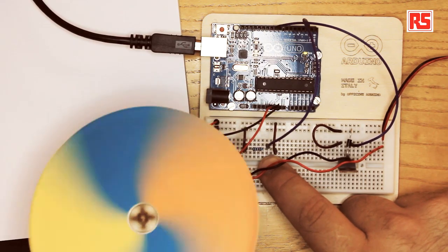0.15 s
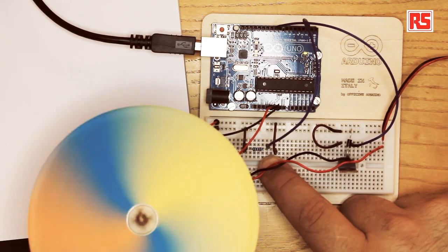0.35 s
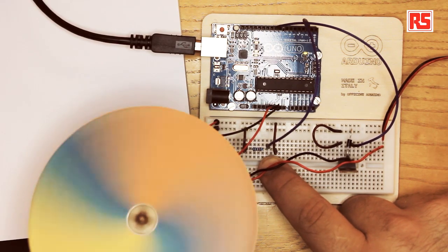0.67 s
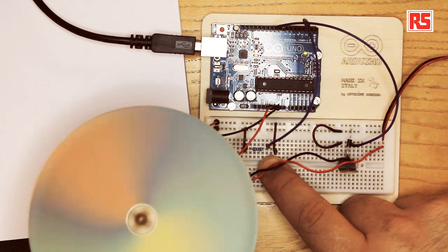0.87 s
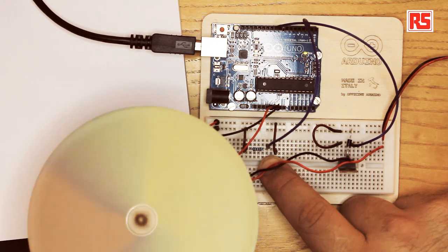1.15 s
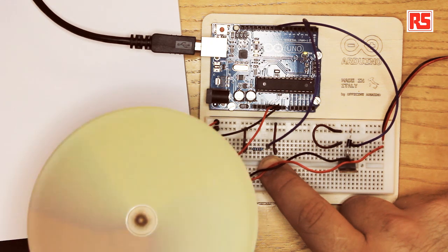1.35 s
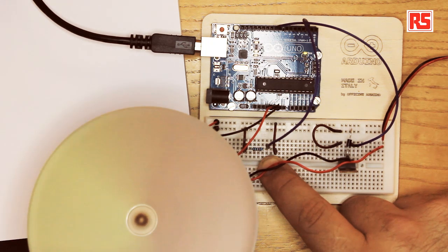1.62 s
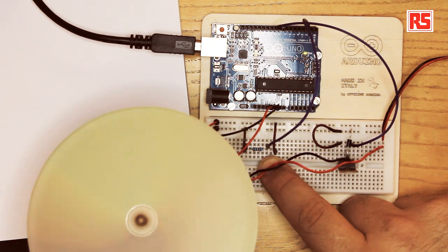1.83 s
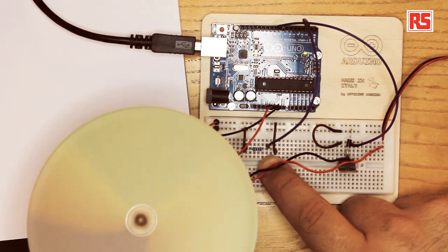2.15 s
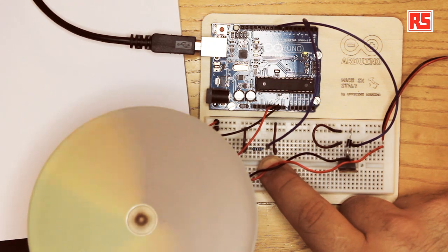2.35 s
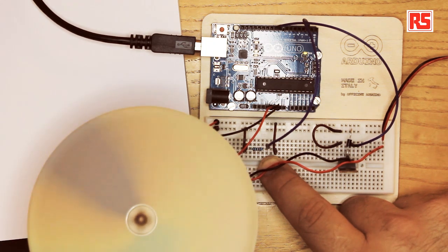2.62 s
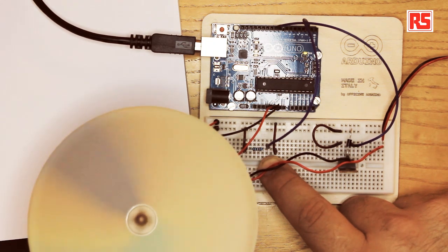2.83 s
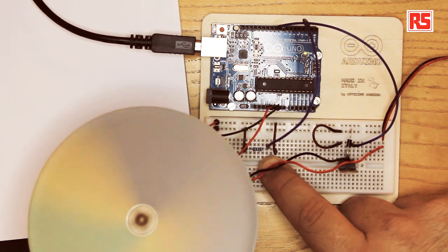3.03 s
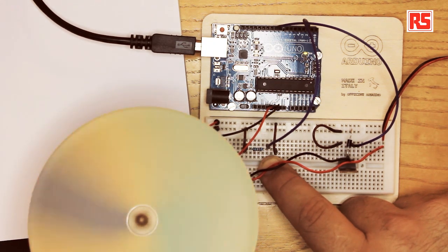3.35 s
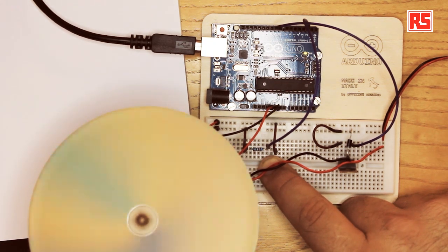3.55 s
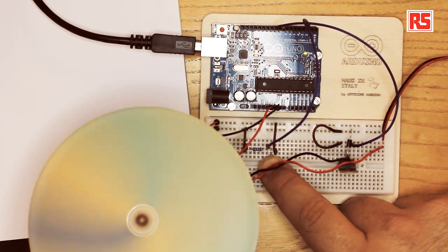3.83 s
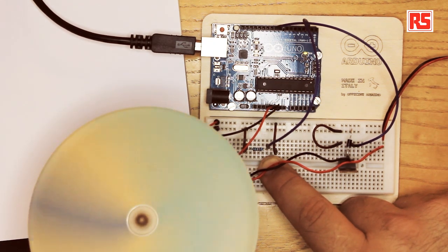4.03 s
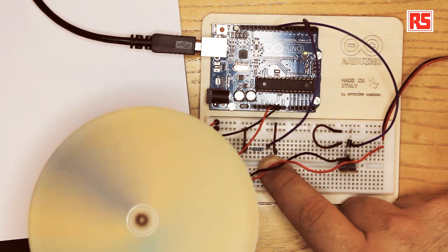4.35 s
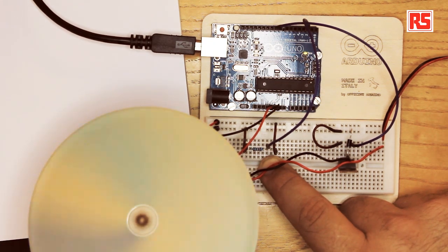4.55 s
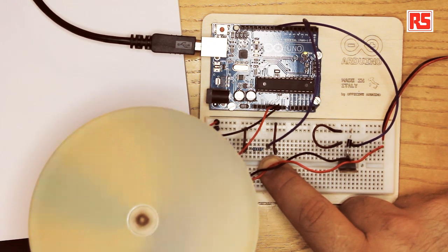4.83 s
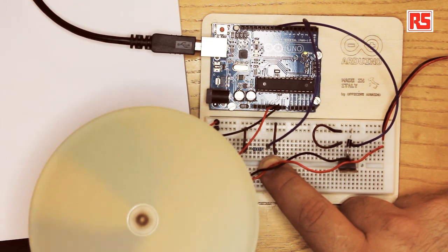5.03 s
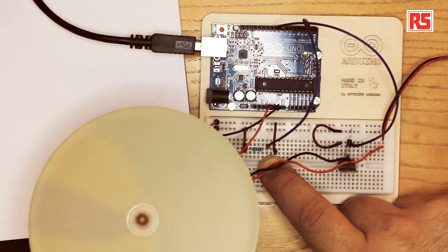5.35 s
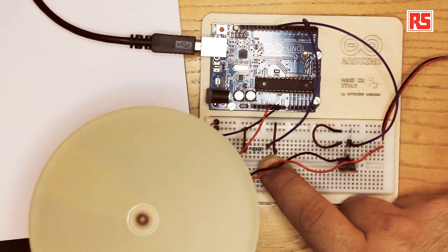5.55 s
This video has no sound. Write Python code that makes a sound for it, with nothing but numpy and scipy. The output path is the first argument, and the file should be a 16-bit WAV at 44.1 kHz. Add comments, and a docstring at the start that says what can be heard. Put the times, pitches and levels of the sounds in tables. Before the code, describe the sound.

A small hobby motor spins up a light disc on a table. For about 1.2 seconds its loose shaft squeals loudly around 700 Hz, throbbing faster and faster. A quick downward slip cuts it; after a brief near-gap a far quieter whirl catches, a dense knocking buzz near 250 Hz with thin metallic treble and brushing hiss, sinking slightly to the end. Close microphone, dry quiet room, faint hum.

```python
"""Motor-driven card disc with a rattling shaft

A small motor spins up a light card disc on a table; its shaft rattles in the loose bearing. First a loud squeal
throbs with each turn: harmonics split into lines one turn apart. After a sudden slip, a gliding note, comes a
slower whirl of light knocks: low lines mixed with the shaft speed and a comb coloured by the casing resonances.
Filtered noise gives brush hiss, a scrape once a turn and a low room rumble; a wavering sine gives mains hum."""
import sys
import numpy as np
from scipy import signal
from scipy.fft import rfft, irfft
from scipy.io import wavfile

SR = 44100
rng = np.random.default_rng(int(sys.argv[2]) if len(sys.argv) > 2 else 0)


def wav_out(sig):
    """Save sig, one row per channel (or a flat mono array), as 16-bit PCM at SR to the path in sys.argv[1]."""
    wavfile.write(sys.argv[1], SR, np.round(np.clip(np.atleast_2d(sig).T, -1, 1) * 32767).astype(np.int16))


def attenuation_scalar(level_db):
    """Turn a level in dB into a linear amplitude multiplier (20 dB per decade)."""
    decades = np.asarray(level_db, float) / 20
    return 10 ** decades


N = 250488
TIME = np.arange(N) / SR

# brush and bearing hiss in the table top: f/Hz, relative density/dB
TABLE_SPECTRUM = [(280, -15), (480, -6), (718, -7), (815, -12.5), (954, -5.5), (1120, -15.5), (1440, -2),
                  (1880, -12), (2420, -13.5), (2920, -6.5), (3380, -19.5), (4530, -13.5), (5000, -23.5),
                  (6500, -7), (11000, -120)]
# falling note as the shaft slips out of the squeal: start/s, peak/dB, from/Hz, to/Hz, length/s
SLIP_NOTE = (1.23, -41, 640, 430, .022)
CUT_S = SLIP_NOTE[0] + SLIP_NOTE[4] / 2   # mid-slip: the squeal is cut
CATCH_S, COMB_ATTACK_S = 1.36, .12   # the whirl sets in; attack of its comb and scrape


def in_time(rows):
    """Columns of a table against t/s, read at every sample."""
    s, *columns = np.transpose(rows)
    return [np.interp(TIME, s, c) for c in columns]


def angle(hz):
    """Running phase of a rate curve, rad."""
    return 2 * np.pi * np.cumsum(hz) / SR


def rise(start_s, attack_s):
    """0 until the start, then exponentially towards 1."""
    return 1 - np.exp(-np.maximum(TIME - start_s, 0) / attack_s)


def drift(rate_hz, size=N):
    """Slow random curve of spread 1: two-pole low-passed noise, made at SR / 8."""
    r = np.exp(-16 * np.pi * rate_hz / SR)
    noise = rng.standard_normal(size // 8 + 3002)
    slow = signal.lfilter([1], [1, -2 * r, r * r], noise)[3000:]   # settled part
    return np.interp(np.arange(size) / 8, np.arange(len(slow)), slow / slow.std())


def spectrum_db(spectrum, hz):
    """A spectrum table read on a log frequency axis, -90 dB outside it."""
    points = np.array(spectrum)
    return np.interp(np.log(hz), np.log(points[:, 0]), points[:, 1], -90, -90)


def coloured(spectrum):
    """Noise of rms 1 with the given spectrum."""
    hz = np.fft.rfftfreq(N, 1 / SR) + 1
    x = irfft(rfft(rng.standard_normal(N)) * attenuation_scalar(spectrum_db(spectrum, hz)), N)
    return x / x.std()


def room():
    """Wavering mains hum, deep noise and passing low rumbles."""
    # passing rumbles: t/s, peak level/dB, 1/e half length/s
    passing = [(0.673, -71, 0.049), (2.027, -66, 0.083), (2.257, -60, 0.13), (2.48, -66, 0.095),
               (4.84, -62.5, 0.12), (5.35, -70, 0.17)]
    # deep noise: f/Hz, relative density/dB
    deep_spectrum = [(12, -60), (20, -31), (65, -11.5), (92, -2), (113, -17), (124, -22), (140, -19),
                     (180, -29), (310, -120)]
    hum_hz, hum_db, deep_db, rumble_floor_db = 100.8, -69.5, -70.5, -71.5
    hum_phase = 2 * np.pi * hum_hz * TIME + .5 * drift(12.0)
    hum = np.sqrt(2) * attenuation_scalar(hum_db + 2.0 * drift(5.1)) * np.sin(hum_phase)
    swells = sum(attenuation_scalar(db) * np.exp(-((TIME - s) / half_s) ** 2) for s, db, half_s in passing)
    floor = attenuation_scalar(rumble_floor_db + 2.0 * drift(1.8))
    rumble = (floor + swells) * coloured([(120, -4), (160, 2), (300, 4.0), (400, 1.0)])
    return hum + rumble + attenuation_scalar(deep_db) * coloured(deep_spectrum)


def surge_db():
    """A brief level bump as the whirl catches."""
    peak_db, peak_after_s = 2, 0.065
    part = np.maximum(TIME - CATCH_S, 0) / peak_after_s
    return peak_db * part * np.exp(1 - part)


def hiss_db(start_db, squeal_db_per_s, slipped_db, whirl_db, whirl_db_per_s):
    """A ramp during the squeal; a drop at the slip, a return, a surge and a slow trend."""
    return_s = 0.056
    later = slipped_db + (whirl_db - slipped_db) * rise(CUT_S, return_s)
    later = later + surge_db() + whirl_db_per_s * (TIME - CUT_S)
    return np.where(TIME < CUT_S, start_db + squeal_db_per_s * TIME, later)


def hiss(turn, knock):
    """Brush and bearing rubbing noise: pulses with each turn in the table top, also with each knock in the casing."""
    # both levels: start/dB, squeal slope/(dB/s), just after the slip/dB, whirl/dB, whirl slope/(dB/s)
    table_level = (-61.5, 0, -63, -54, -0.66)
    casing_level = (-52.5, 2, -62, -48.5, -1.27)
    # hiss in the casing: f/Hz, relative density/dB
    casing_spectrum = [(4000, -44), (5000, -26), (5900, -18), (6500, -11), (7000, -19), (7400, -14),
                       (8200, -20), (9700, -14), (10500, -4), (11900, -5), (12500, -13), (13200, -10),
                       (14200, -18), (15000, -14), (16000, -15)]
    table_pulse = 1 + 0.18 * np.cos(turn - 1.3) + 0.074 * np.cos(2 * turn)
    table = attenuation_scalar(hiss_db(*table_level)) * table_pulse * coloured(TABLE_SPECTRUM)
    casing_pulse = (1 + 0.38 * np.cos(knock)) * (1 + 0.12 * np.cos(2 * turn - .4))
    casing = attenuation_scalar(hiss_db(*casing_level)) * casing_pulse * coloured(casing_spectrum)
    return attenuation_scalar(2.1 * drift(61.0)) * (table + casing)


def side_tone():
    """A faint rising sine beside the squeal, wavering in level."""
    # t/s, f/Hz, mean level/dB
    pitch_and_level = [(0, 900, -66), (.25, 958, -69), (.73, 1027, -73), (1.0, 1050, -90)]
    hz, db = in_time(pitch_and_level)
    return np.sqrt(2) * attenuation_scalar(db + 3.0 * drift(7.9)) * np.sin(angle(hz))


def scrape(turn):
    """One noise burst a turn in the whirl, coloured by the table top and wavering in level."""
    # f/Hz, relative density/dB
    scrape_spectrum = [(1100, -23), (1350, -2), (1460, -4.5), (1650, -7), (2400, -30), (2750, -5),
                       (2950, 0), (3300, -42)]
    catch_db, db_per_s, sharpness, burst_rad = -58, 1, 6.2, 0.92
    burst = np.exp(sharpness * (np.cos(turn - burst_rad) - 1))
    level = attenuation_scalar(catch_db + db_per_s * (TIME - CATCH_S) + 2.5 * drift(5.0))
    return level * rise(CATCH_S, COMB_ATTACK_S) * burst * coloured(scrape_spectrum)


def slip():
    """The shaft slips out of the squeal: a brief sine gliding down under a sin^2 envelope."""
    start_s, peak_db, from_hz, to_hz, length_s = SLIP_NOTE
    part = np.clip((TIME - start_s) / length_s, 0, 1)
    glide = np.sin(angle(from_hz + (to_hz - from_hz) * part))
    return attenuation_scalar(peak_db) * np.sin(np.pi * part) ** 2 * glide


def casing_db(hz):
    """Gain of the casing: its resonances over a weak plateau in the treble."""
    # f/Hz, width/Hz, peak gain over the plateau's power/dB
    resonances = [(7330, 90, -6), (7750, 400, -13), (9000, 900, -14), (10550, 260, 2), (11250, 260, -4),
                  (12050, 330, -6), (13200, 600, -11), (15000, 700, -15)]
    plateau_db = -24
    power = attenuation_scalar(2 * plateau_db) / (1 + (6500 / hz) ** 6)
    for centre_hz, width_hz, db in resonances:
        power = power + attenuation_scalar(2 * db) / (1 + (2 * (hz - centre_hz) / width_hz) ** 2)
    return 10 * np.log10(power)


def low_family(turn, knock):
    """A low tone and its partners, evenly spaced around two whirl lines."""
    # low tone: t/s, f/Hz, level/dB
    low_tone = [(1.36, 326, -100), (1.45, 338, -70), (1.6, 353.4, -58), (1.9, 353.5, -58), (2.8, 342, -59),
                (3.6, 330, -64), (4.6, 315, -88)]
    hz, db = in_time(low_tone)
    main = 2 * knock - 2 * turn
    step = main - angle(hz)
    # multiple of main, steps, relative level/dB; the first is the low tone itself
    partners = [(1, -1, 0.0), (1, 1, -6.0), (1, 2, -8.0), (2, 1, -8.0), (2, -1, -9.0), (2, -2, -7.0)]
    lines = sum(attenuation_scalar(d + 0.5 * drift(11.0)) * np.sin(k * main + m * step) for k, m, d in partners)
    return np.sqrt(2) * attenuation_scalar(db) * lines


def fine_lines(turn, knock_hz, knock):
    """No two knocks of a turn are alike, so faint lines one turn apart surround each low overtone."""
    base_db = -69   # before the table-top spectrum
    out, facing = np.zeros(N), np.exp(1j * turn)
    for k in range(2, 14):
        spread_db, start_rad = rng.normal(0, 4, 9), rng.uniform(0, 2 * np.pi, 9)
        pattern = np.polyval(attenuation_scalar(spread_db) * np.exp(1j * start_rad), facing) / facing ** 4   # -4 to +4 turns
        level = attenuation_scalar(base_db + spectrum_db(TABLE_SPECTRUM, k * knock_hz) + 1.9 * drift(1.9))
        out += level * np.real(pattern * np.exp(1j * k * knock))
    return out


def low_lines(turn, knock, settled):
    """Clean low lines of the whirl, at knock rate multiples mixed with shaft speed multiples."""
    # multiple of knock rate, multiple of shaft speed, level at 1.7 s before trim and swell/dB, slope/(dB/s)
    mixed_lines = [(2, -2, -55, .1), (2, -1, -72, 0), (2, 0, -72, 0), (2, 1, -70, 0), (3, 0, -65, -.3),
                   (4, -4, -64, 0), (6, -1, -68, 0), (6, 0, -59, -1.4), (6, 1, -64, -1), (9, 0, -65, .3),
                   (9, -1, -73, 0), (12, 0, -70, .4)]
    # multiples 4 and 9 swell for a while: t/s, gain/dB, 1/e half length/s
    line_swell = (4.2, 4, .7)
    trim_db, delay_s, attack_s = -0.5, .018, .025
    swell_s, swell_peak_db, half_s = line_swell
    swell_db = swell_peak_db * np.exp(-((TIME - swell_s) / half_s) ** 2)
    out = np.zeros(N)
    for k, m, db, db_per_s in mixed_lines:
        level_db = db + db_per_s * (TIME - 1.7) + 1.0 * drift(3.0)
        if k in (4, 9):
            level_db = level_db + swell_db
        if k == 6:
            level_db = level_db + 1.5 * drift(15.0)
        line = attenuation_scalar(level_db) * np.sin(k * knock + m * turn + k * m)
        out += line * settled if k >= 6 else line
    return attenuation_scalar(trim_db + surge_db()) * rise(CATCH_S + delay_s, attack_s) * out


def whirl(turn, knock_hz, knock):
    """Steady knocks: low lines mixed with the shaft speed, and a comb of high overtones coloured by the casing."""
    # gain of the comb: t/s, gain/dB
    comb_gain = [(2.3, 0), (3.7, -1.5), (4.8, -1), (5.68, -1.5)]
    # overtones that stand out or fall back: multiple of knock rate, gain/dB
    odd_overtones = {43: 2, 45: 1.5, 47: 4, 48: -7, 51: 5}
    knock_db, every_third_db = -54.5, 4   # before the casing gain
    settled = attenuation_scalar(in_time(comb_gain)[0]) * rise(CATCH_S, COMB_ATTACK_S)
    out = low_lines(turn, knock, settled) + settled * fine_lines(turn, knock_hz, knock)
    coarse_hz, coarse_index = knock_hz[::256], np.arange(0, N, 256)   # levels vary slowly
    facing = np.exp(1j * turn)
    for k in range(14, 68):
        db = knock_db + casing_db(k * coarse_hz) + every_third_db * (k % 3 == 0)
        db = db + odd_overtones.get(k, 0) + 2.0 * drift(1.0)[::256]
        level = np.interp(np.arange(N), coarse_index, attenuation_scalar(db))
        # each overtone peaks at its own angle of the turn
        throb = 1 + .3 * facing * np.exp(.4j * k) + .2 / facing ** 2 * np.exp(.9j * k)
        out += settled * level * np.real(throb * np.exp(1j * (k * knock + rng.uniform(0, 7.5))))
    return np.sqrt(2) * out


def squeal(turn):
    """The rattle radiates in a pattern that turns with the disc, so each harmonic splits into lines one turn apart."""
    # t/s, rattle rate before the sag/Hz
    rattle_rate = [(0, 700.7), (.35, 711.7), (.75, 725), (1.2, 733.5)]
    # harmonics 1, 2, ..: side lines before the swell/dB, centre over side lines at 0 s/dB,
    # upper over lower side line/dB, pattern angle/turns
    harmonics = [(-40, 5.5, -8, .68), (-43.5, -15, -6, 0.56), (-56.5, -15, -10.5, 0.83),
                 (-51, -19, 6, 0.14), (-58, -35, -1.5, 0.56), (-61, -35, 0.5, 0.628), (-69, -24, -4, 0.635),
                 (-62.5, -26, 0, 0.13), (-59.5, -1.5, -1, 0.664)]
    # rasp between the harmonics: f/Hz, relative density/dB
    rasp_spectrum = [(1200, -2), (1900, -5.5), (2500, -1), (3200, -3), (4000, -8.5), (5500, -5),
                     (6500, 1.5), (7500, -29)]
    # the table top radiates poorly here: f/Hz, width/Hz
    table_dips = [(1090, 546), (2480, 410)]
    low_cut_hz = 712   # the squeal is cut away below here
    sag_hz, sag_s = 24.93, 0.01425   # the rate sags just before the cut
    cut_db, cut_length_s, tail_db_per_s = -16, 0.002, -160   # the slip leaves a faint tail that dies away
    high_db = -64.5   # harmonics 10 to 18, before the casing gain
    centre_fade_db_per_s, outer_db = -15, -7   # the throb turns from once to twice a turn
    swell_db_per_s, brighten_db_per_s_octave = -1, 3.5
    rasp_db, rasp_db_per_s = -49, 0.5

    size = round(1.5 * SR)
    t, turn = TIME[:size], turn[:size]
    after_s = t - CUT_S
    sag = sag_hz * np.exp(np.minimum(after_s, 0) / sag_s) * (after_s < 0)
    hz = in_time(rattle_rate)[0][:size] - sag
    db = cut_db * np.clip(after_s / cut_length_s, 0, 1) + tail_db_per_s * np.maximum(after_s, 0)
    # uneven timing blurs the high harmonics
    rattle = angle(hz) + .15 * drift(12.0, size) + .11 * drift(120.0, size)
    # the rate wobbles within each turn
    rattle = rattle + 0.37 * np.sin(2 * turn + .5) + 0.15 * np.sin(turn + 1.7)

    high = [(high_db + casing_db(k * hz.mean()), 0, 0, rng.random()) for k in range(10, 19)]
    out = np.zeros(N)
    for k, (side_db, centre_db, lean_db, pattern_turns) in enumerate(harmonics + high, 1):
        facing = np.exp(1j * (turn - 2 * np.pi * pattern_turns))
        centre = attenuation_scalar(centre_db + centre_fade_db_per_s * t)
        pattern = attenuation_scalar(-lean_db / 2) / facing + centre + attenuation_scalar(lean_db / 2) * facing
        pattern = pattern + attenuation_scalar(outer_db) * np.log2(k) * (facing ** 2 - .6j / facing ** 2)
        swell = swell_db_per_s + brighten_db_per_s_octave * np.log2(k)
        level = attenuation_scalar(db + side_db + swell * np.minimum(t, 1.1) + 2.0 * drift(80.0, size))
        # harmonics roughly in step: one-sided pulses
        carrier = np.exp(1j * (k * rattle + rng.uniform(-1.1, 0.39)))
        out[:size] -= np.sqrt(2) * level * np.real(pattern * carrier)

    rasp_level = attenuation_scalar(db + rasp_db + rasp_db_per_s * t) * (1 + .5 * np.cos(rattle))
    out[:size] += rasp_level * coloured(rasp_spectrum)[:size]
    for dip_hz, width_hz in table_dips:
        out[:size] = signal.lfilter(*signal.iirnotch(dip_hz, dip_hz / width_hz, SR), out[:size])
    low_cut = signal.butter(4, low_cut_hz, "high", fs=SR, output="sos")
    out[:size] = signal.sosfilt(low_cut, out[:size])
    return out


def scene():
    """Sums room and motor; the motor parts other than the side tone and the slip note share the same shaft and
    knock phases."""
    # t/s, shaft speed/(turns/s)
    shaft_speed = [(0, 3.0), (.6, 10.71), (1.24, 18.74), (1.75, 20.9), (2.95, 25.7), (4.15, 31.1),
                   (5.68, 40.3)]
    # t/s, knock rate once the lag has closed/Hz
    settled_rate = [(1.36, 250.7), (2.0, 251.4), (2.38, 249.8), (2.51, 248.0), (2.67, 247.9), (3.12, 244.4),
                    (3.4, 244.2), (4.48, 238.6), (5.11, 232.4), (5.5, 230.6), (5.68, 230.4)]
    lag_hz, catch_up_s = 73, .068   # the whirl sets in slow and closes the gap
    turn = angle(in_time(shaft_speed)[0])
    knock_hz = in_time(settled_rate)[0] - lag_hz * (1 - rise(CATCH_S, catch_up_s))
    knock = angle(knock_hz) + .008 * drift(20.0)   # uneven timing
    rubbing = hiss(turn, knock) + scrape(turn)
    rattling = side_tone() + slip() + low_family(turn, knock) + whirl(turn, knock_hz, knock) + squeal(turn)
    return (room() + rubbing + rattling)[None]


def low_pass(x):
    """Removes everything above the highest recorded frequency."""
    return signal.sosfilt(signal.butter(12, 15750, fs=SR, output="sos"), x)


def record(dry):
    """The finished mix is the dry scene with the treble cut off above 15.75 kHz."""
    return low_pass(dry)


dry = scene()
out = record(dry)
wav_out(out)
```